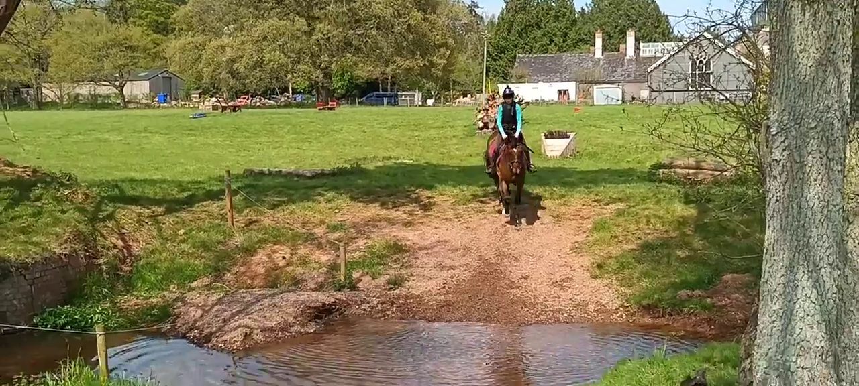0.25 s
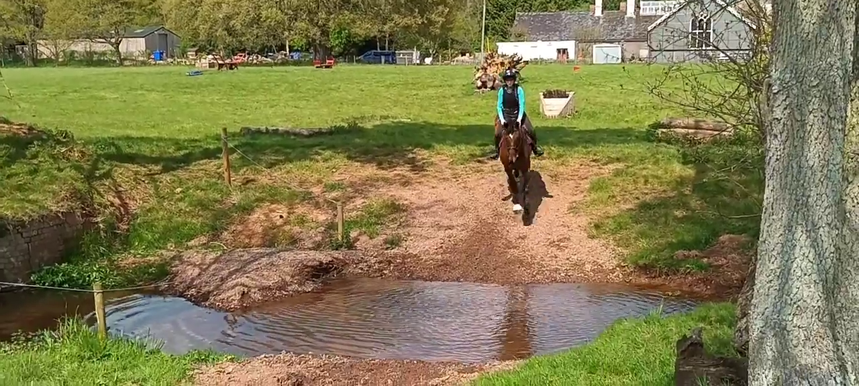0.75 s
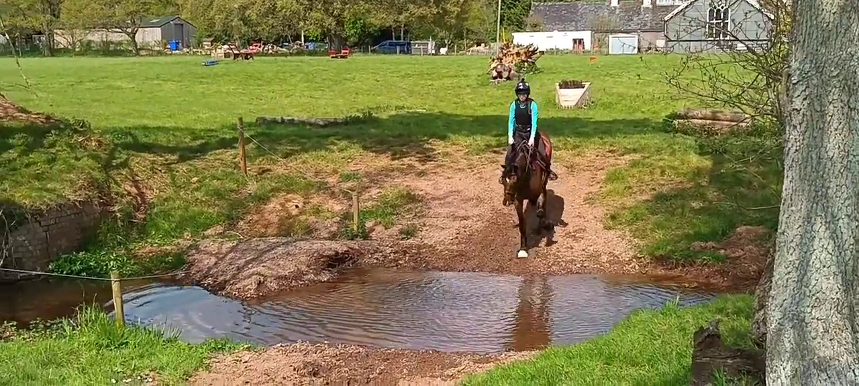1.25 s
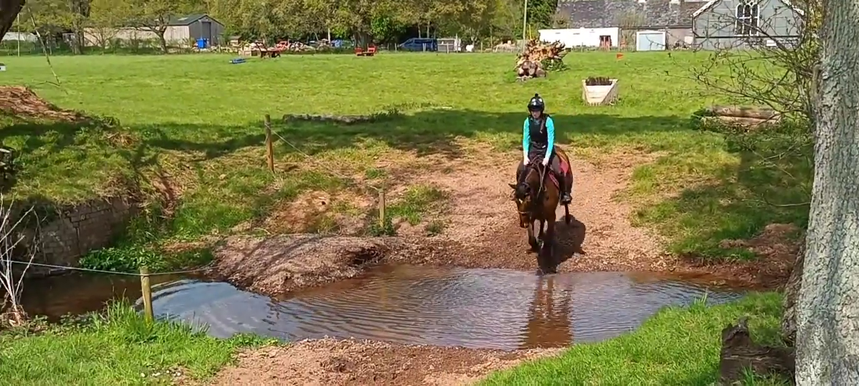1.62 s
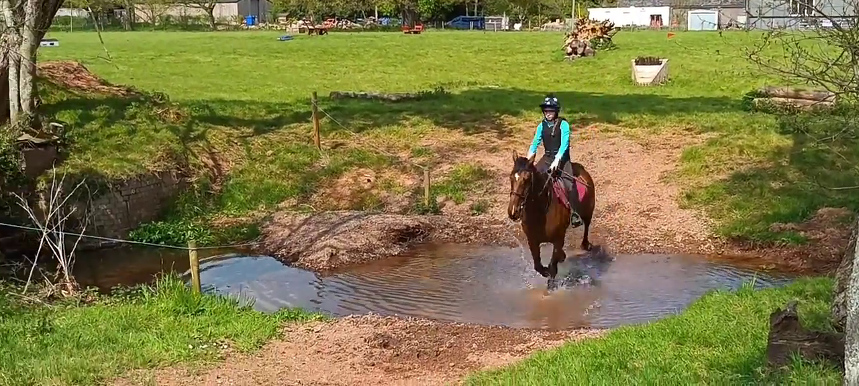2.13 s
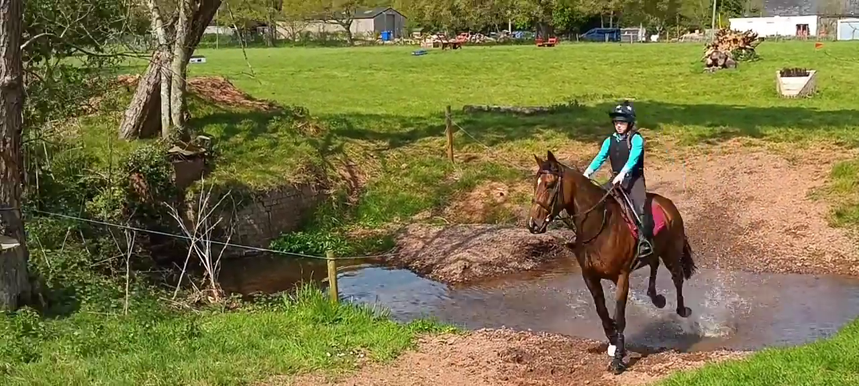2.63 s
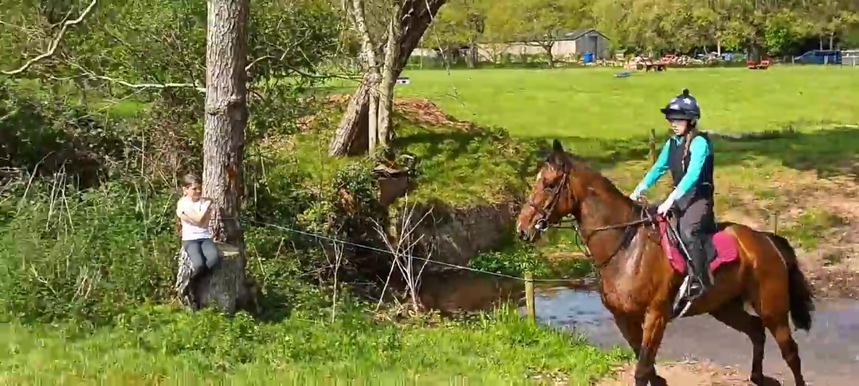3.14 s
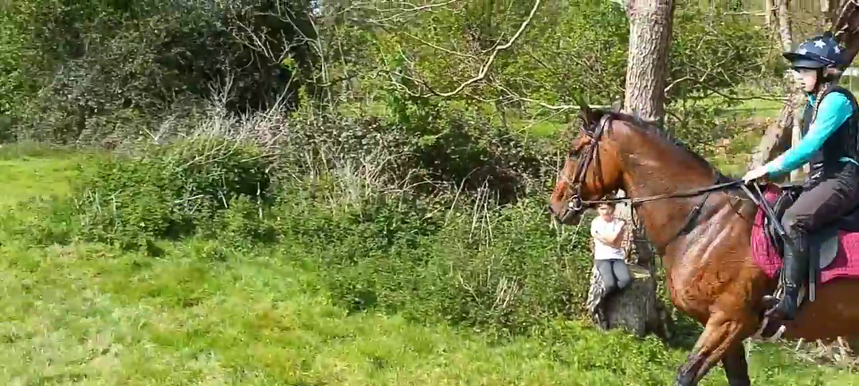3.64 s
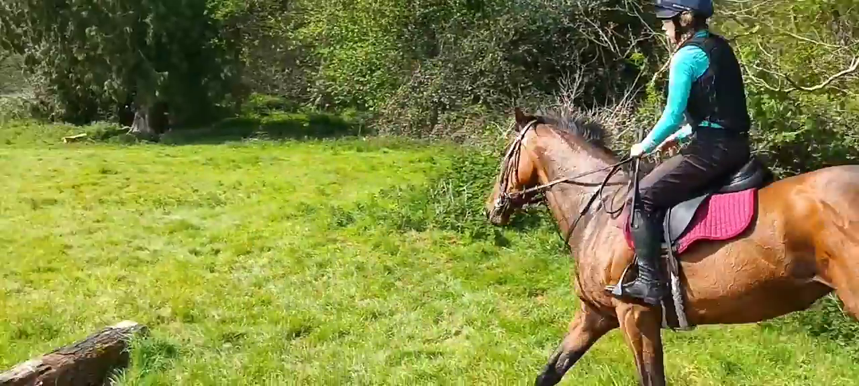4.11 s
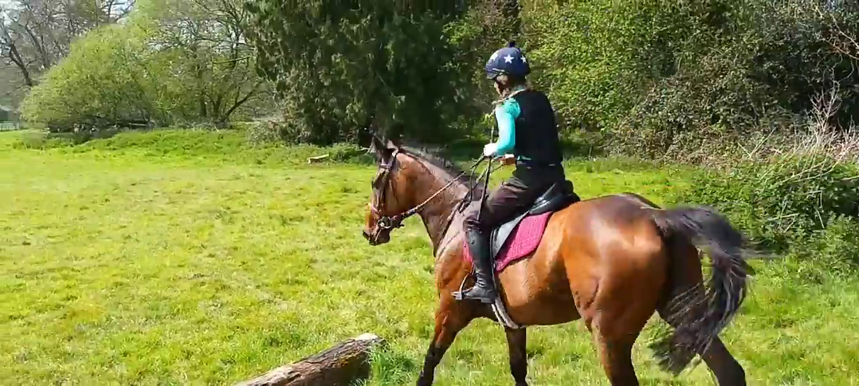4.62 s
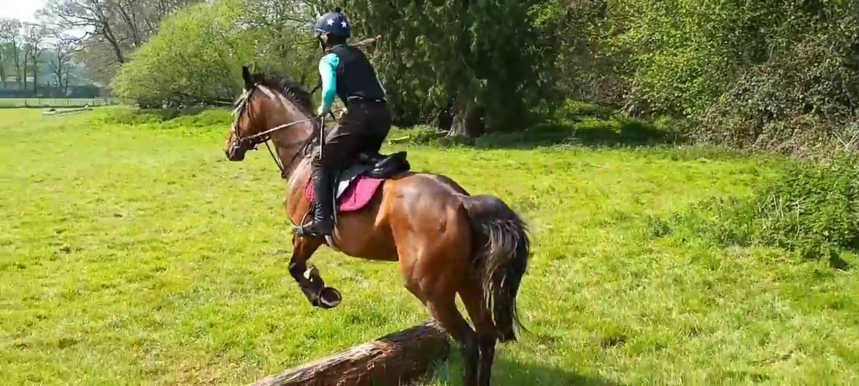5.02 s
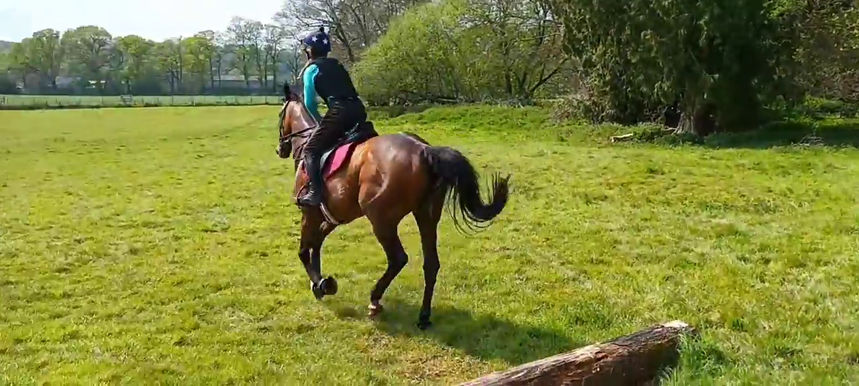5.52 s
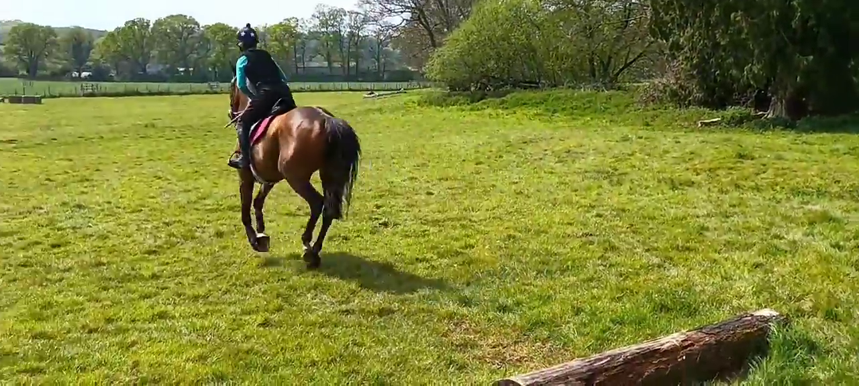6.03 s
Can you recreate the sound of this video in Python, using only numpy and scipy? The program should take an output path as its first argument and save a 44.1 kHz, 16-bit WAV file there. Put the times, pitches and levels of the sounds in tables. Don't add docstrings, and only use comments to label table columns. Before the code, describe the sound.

A horse splashes through a shallow ford in growing bursts of spray, then thuds across turf with clacking shoes, ticking tack and swishing grass.

```python
import sys
import numpy as np
from scipy import signal
from scipy.fft import rfft, irfft, next_fast_len
from scipy.io import wavfile
from scipy.ndimage import map_coordinates

SR = 44100
rng = np.random.default_rng(int(sys.argv[2]) if len(sys.argv) > 2 else 0)


def volts_from_db(level):
    exponent = np.asarray(level, float) / 20
    return 10 ** exponent


def log_audio(samples):
    frames = np.atleast_2d(samples).T
    limited = np.clip(frames, -1, 1)
    pcm = np.round(limited * 32767).astype(np.int16)
    wavfile.write(sys.argv[1], SR, pcm)


N = 276066


def rms_one(x):
    return x / np.sqrt(np.mean(x ** 2) + 1e-20)


def in_time(rows):
    s, *columns = np.transpose(rows)
    return [np.interp(np.arange(N) / SR, s, c) for c in columns]


def at_hz(points, hz):
    table_hz, table_value = np.array(points).T
    return np.interp(np.log(hz), np.log(table_hz), table_value)


def band(x, low_hz, high_hz, order=2):
    return signal.sosfilt(signal.butter(order, [low_hz, high_hz], "band", fs=SR, output="sos"), x)


def drift(rate):
    r = np.exp(-40 * np.pi * rate / SR)
    slow = signal.lfilter([1], [1, -2 * r, r * r], rng.standard_normal(N // 20 + 2002))[2000:]
    return np.interp(np.arange(N) / 20, np.arange(len(slow)), rms_one(slow))


def sides(pan_db):
    return np.array([volts_from_db(pan_db / 2), volts_from_db(-pan_db / 2)]) / np.cosh(pan_db / 17.4)


def add(out, s, sound, pan_db):
    i = round(s * SR)
    sound = sound[:N - i]
    out[:, i:i + len(sound)] += sides(pan_db)[:, None] * sound


# (frequency [Hz], gain [dB])
LEFT_PORT = [(200, -0.5), (1500, -5.5), (2300, -6), (3300, 4), (3700, -1.5), (4400, 2.5), (5200, -2.5),
             (6100, 5.5), (6900, 5), (7600, -2), (8300, -12), (10000, -11), (13700, -18), (15000, -11.5)]
RIGHT_PORT = [(200, -0.5), (1500, -1.5), (2350, 6), (3100, 6), (3800, 3.5), (4700, 7.5), (5500, 7.5),
              (6000, 0), (6500, -15), (8000, -43), (10000, -54.5), (12200, -44), (13800, -34.5),
              (15000, -15)]


def knock(hz, t60, spread, chance, echo_db):
    t = np.arange(round(0.25 * SR)) / SR
    pitches = hz * np.exp(spread * np.r_[0, chance[:3]])[:, None]
    phases = np.pi + 0.54 * chance[3:, None]
    rings = np.sin(2 * np.pi * pitches * t + phases) * volts_from_db(-60 * t / max(t60, 0.003))
    swell = (1 - np.exp(-t / (1.53 / hz + 0.00042))) ** 2
    sound = (rings * [[1], [0.7], [0.7], [0.7]]).sum(0) * swell
    sparse = rng.standard_normal(3000) * (rng.random(3000) < 0.012)
    echoes = sparse * volts_from_db(echo_db - 60 * t[:3000] / 0.19)
    sound = sound + signal.fftconvolve(sound, echoes)[:len(t)]
    port_gain = (volts_from_db(at_hz(LEFT_PORT, hz)) + volts_from_db(at_hz(RIGHT_PORT, hz))) / 2
    return sound / np.abs(sound).max() / port_gain


def thud(hz, t60, boom_db, luck):
    push = knock(hz, t60, 0.512, luck, echo_db=-23.0)
    return push + volts_from_db(boom_db) * knock(82.0, 0.085, 0.55, luck, echo_db=-20)


def clicks(rows, t60):
    out, chance = np.zeros((2, N)), rng.uniform(-0.89, 1, (len(rows), 7))
    t = np.arange(1500) / SR
    gather_and_die = (1 - np.exp(-t / 0.00097)) ** 2 * volts_from_db(-60 * t / 0.018)
    grit = rng.standard_normal((len(rows), 1500)) * gather_and_die
    grit[:, 80] += 2.5
    cracks = band(grit, 1500, 10000, order=1)
    for (s, db, hz, crack_db, pan_db), luck, crack in zip(rows, chance, cracks):
        add(out, s, volts_from_db(db) * knock(hz, t60, 0.2, luck, echo_db=-30), pan_db)
        add(out, s, volts_from_db(db + crack_db) * crack, pan_db)
    return out


# (frequency [Hz], level [dB])
FAR_HUM = [(382, -84.5), (522, -99)]


def far_hum():
    t = np.arange(N) / SR
    tones = sum(volts_from_db(db + 6 + drift(1.7)) * np.sin(2 * np.pi * hz * t) for hz, db in FAR_HUM)
    return tones * np.clip(t - 2.4, 0.3, 1)


# (time [s], level [dB], left-right [dB])
BREEZE = [(0.0, -71.5, 11), (0.15, -85, 5), (0.85, -78, -6), (1.1, -61.5, 11.5), (1.24, -59, -10.5),
          (1.39, -62.5, 22), (1.6, -58, -21), (1.71, -71, -15), (2.39, -80.5, 6.5), (3.24, -65, -3),
          (3.49, -78, 5), (3.63, -75, 15), (3.9, -80, -4.5), (4.43, -76.5, -2), (4.92, -72.5, -7),
          (5.13, -83.5, -3), (5.63, -72.5, -3.5), (6.26, -76.5, 0)]


def breeze():
    db, pan_db = in_time(BREEZE)
    rumble = rms_one(band(rng.standard_normal((2, N + SR)), 32, 141.3))[:, SR:]
    lumps = volts_from_db(4.5 * np.array([drift(8.4), drift(6.4)]))
    return volts_from_db(db + 15) * sides(pan_db) * rumble * lumps


# (time [s], peak level [dB], frequency [Hz], left-right [dB])
GUSTS = [
    (0.066, -39, 88.5, 32),
    (0.521, -35, 71.5, 15),
    (0.545, -29.5, 143.6, 14),
    (0.8, -42.5, 115, 30),
    (3.486, -48, 90, 25.5),
    (6.173, -44.5, 94.7, -20),
]


def gusts():
    out, chance = np.zeros((2, N)), rng.uniform(-1.014, 1, (len(GUSTS), 7))
    for (s, db, hz, pan_db), luck in zip(GUSTS, chance):
        add(out, s, volts_from_db(db) * thud(hz, 0.078, -5, luck), pan_db)
    return out


# (time [s], peak level [dB], frequency [Hz], left-right [dB])
FOOTFALLS = [
    (1.198, -59.5, 88.8, -26),
    (1.219, -39, 84.6, -25),
    (1.37, -40, 82, 18),
    (2.1, -49, 88.8, 6),
    (2.471, -46, 116, -15),
    (4.884, -49.5, 65.6, -21),
    (4.957, -54.5, 105, -17),
    (5.27, -53, 231, -1),
    (5.502, -52, 129, -30),
    (5.658, -58, 217, -13),
]


def footfalls():
    out, chance = np.zeros((2, N)), rng.uniform(-1.22, 1, (len(FOOTFALLS), 7))
    for (s, db, hz, pan_db), luck in zip(FOOTFALLS, chance):
        add(out, s, volts_from_db(db + 3.0) * knock(hz, 0.073, 0.33, luck, echo_db=-23.5), pan_db)
    return out


# (time [s], peak level [dB], frequency [Hz])
TICKS = [(0.2728, -42, 6600), (0.4199, -38, 6660), (0.5072, -38, 2420), (0.6709, -48, 5510),
         (0.9494, -40, 2240), (1.6222, -26.5, 2300), (3.7903, -35, 5650), (4.2378, -27, 4400),
         (4.4044, -29, 2350), (4.5027, -34.5, 2310), (4.8713, -45, 2250), (5.1093, -41, 2160),
         (5.4575, -48, 7360)]


def ticks():
    out, chance = np.zeros((2, N)), rng.uniform(-1.22, 1, (len(TICKS), 7))
    for (s, db, hz), luck in zip(TICKS, chance):
        add(out, s, volts_from_db(db - 5.5) * knock(hz, 0.0087, 0.2, luck, echo_db=-28), 4)
    return out


# (time [s], length [s], level [dB], frequency [Hz])
BLOWS = [
    (2.779, 0.059, -72, 640),
    (4.327, 0.037, -78.5, 730),
    (4.331, 0.087, -78.5, 1150),
]


def nostrils():
    out = np.zeros((2, N))
    for s, length, db, hz in BLOWS:
        air = rms_one(band(rng.standard_normal(8000), hz, hz * 1.195))[2000:]
        t = np.arange(len(air)) / SR
        puff = np.sqrt(np.sin(np.pi * np.minimum(t / length, 1)) + 1e-9)
        add(out, s, volts_from_db(db + 27) * air * puff, 0)
    return out


# (time [s], peak level [dB])
CHINKS = [
    (0.725, -46),
    (.744, -23.5),
    (0.757, -36),
    (.769, -41),
    (0.777, -39),
    (0.789, -45),
    (0.803, -45),
]
# (frequency [Hz], level [dB], t60 [s])
BIT_RING = [(5340, 0, 0.025), (5950, 4.5, 0.0077), (8860, -11, 0.034)]


def bit_ring():
    out, t = np.zeros((2, N)), np.arange(SR // 10) / SR
    ring = sum(volts_from_db(db - 60 * t / t60) * np.sin(2 * np.pi * hz * t) for hz, db, t60 in BIT_RING)
    onset = 1 - np.exp(-t / 0.00072)
    for s, db in CHINKS:
        add(out, s, volts_from_db(db) * ring * onset, 1.5)
    return out


# (time [s], peak level [dB], frequency [Hz], crack share [dB],
# left-right [dB])
BUCKLES = [(3.321, -36, 5170, -13, 2), (3.5, -36, 5200, -7, 1), (3.545, -31.5, 5330, -18, -2),
           (3.671, -32, 4960, 1, 18), (3.722, -57, 4500, -8, -12), (3.921, -37.5, 5300, -17, 8),
           (4.005, -41, 6200, 5.5, -17), (4.44, -33.5, 3230, 0.5, 18), (4.457, -34, 4050, -21, 19),
           (4.66, -43.5, 6840, -13, 13), (4.785, -23.5, 5680, -3.5, 13), (4.964, -44.5, 5600, 9.5, 17),
           (5.254, -34.5, 5130, 0, 27), (5.269, -13, 5060, -6, 5.5), (5.42, -40.5, 5260, 0.5, 4),
           (5.493, -39.5, 5540, -12, 12)]


def buckles():
    return clicks(BUCKLES, t60=0.0051)


# (time [s], peak level [dB], frequency [Hz], crack share [dB], left-right [dB])
STONES = [(2.618, -17.5, 1077, 0, 1), (2.711, -23, 1020, -1, -1.5), (3.124, -15.5, 714, -9, 3.5),
          (3.237, -19, 1287, -5, 0), (3.351, -21.5, 2410, 0.5, -3), (4.025, -16, 2286, -4.5, 13),
          (4.151, -38, 2810, -18, -17), (4.226, -24.5, 620, -26, 4), (4.892, -38, 2230, 2, 9),
          (5.136, -35.5, 2290, 5, 8), (5.671, -39.5, 1316, -0.5, 13), (5.843, -35, 2700, 10.5, 8),
          (6.051, -27.5, 1435, -33, 25)]


def stones():
    return clicks(STONES, t60=0.014)


# (time [s], peak level [dB], frequency [Hz], t60 [s], left-right [dB])
HOLLOWS = [(1.078, -36, 706, 0.11, 5), (1.087, -27.5, 1440, 0.056, 6), (2.712, -29, 1390, 0.021, 6),
           (3.237, -21.5, 2280, 0.012, 3.5), (3.234, -29, 515, 0.023, 8), (3.353, -38.5, 903, 0.065, 11),
           (3.6, -37, 1810, 0.069, -11), (3.644, -35, 950, 0.073, 3), (4.021, -31, 1550, 0.034, -5),
           (5.135, -37.5, 1330, 0.026, 9), (5.269, -34, 1094, 0.013, 11), (5.67, -40.5, 2500, 0.031, 0),
           (6.049, -42.5, 4270, 0.011, 25.5), (1.954, -30.5, 596, 0.057, 6)]


def hollows():
    out, chance = np.zeros((2, N)), rng.uniform(-1.027, 1, (len(HOLLOWS), 7))
    for (s, db, hz, t60, pan_db), luck in zip(HOLLOWS, chance):
        add(out, s, volts_from_db(db) * knock(hz, t60, 0.2, luck, echo_db=-30), pan_db)
    return out


# (time [s], peak level [dB], frequency [Hz], crack share [dB], left-right [dB])
SMACKS = [(0.543, -33, 6720, -14, 30), (1.037, -38, 4380, 5, 5), (1.077, -23, 6700, -12.5, 13),
          (1.171, -26.5, 6040, 4.5, 7.5), (1.304, -23, 6430, -6.5, 5), (1.382, -24.5, 1960, -18.5, 7.5),
          (1.43, -17, 6130, -14, 3.5), (1.552, -9, 5880, -10.5, -4), (1.639, -13, 2250, 0, 4),
          (1.664, -27, 706, -11, -10), (1.86, -14.5, 5740, 2, -4), (2.095, -27, 6370, 3.5, 30),
          (2.196, -16, 6100, -12, -6)]


def smacks():
    return clicks(SMACKS, t60=0.013)


# (time [s], peak level [dB], frequency [Hz], boom share [dB])
HOOFBEATS = [(1.46, -30.5, 253, -7), (1.656, -23.5, 358, -40), (1.884, -35, 317, -31),
             (1.989, -33.5, 328, -17.5), (2.121, -37.5, 250, -11), (2.228, -43.5, 211, -25),
             (2.551, -31, 264, -10.5), (2.604, -33.5, 260, -14), (2.707, -39, 240, -5.5),
             (2.985, -41.5, 161, -21), (3.113, -26, 283.6, -6), (3.225, -24.5, 350, -17),
             (3.582, -32.5, 224, -25), (3.63, -26.5, 222, -22), (4.176, -29, 228, -10.5),
             (4.219, -25.5, 347, -8.5), (4.546, -24.5, 213, -10.5)]


def hoofbeats():
    t60, pan_db, delay_s = 0.058, -1.5, 0.00298
    out, chance = np.zeros((2, N)), rng.uniform(-1.014, 1, (len(HOOFBEATS), 7))
    puff = rms_one(band(rng.standard_normal(N), 153.4, 1380))
    for (s, db, hz, boom_db), luck in zip(HOOFBEATS, chance):
        s = s + delay_s
        push = thud(hz, t60, boom_db, luck)
        turf = puff[round(s * SR):][:len(push)]
        push[:len(turf)] += volts_from_db(-24.0) * turf * volts_from_db(-60 * np.arange(len(turf)) / SR / 0.058)
        add(out, s, volts_from_db(db) * push, pan_db)
    return out


def droplets(per_s, spread_db, cycles):
    landed = rng.random(N) < per_s * volts_from_db(5.0 * drift(30.0)) / SR
    sizes = landed * volts_from_db(spread_db * np.minimum(rng.exponential(1, N), 4)) * rng.choice([-1, 1], N)
    dealt, out = rng.integers(0, 30, N), 0
    for k, hz in enumerate(np.geomspace(300, 14000, 30)):
        r = volts_from_db(-60 * hz / (cycles * SR))
        turn = 2 * np.pi * hz / SR
        rings = signal.lfilter([1], [1, -2 * r * np.cos(turn), r * r], sizes * (dealt == k) + 1e-18)
        out = out + hz * rings * np.sin(turn)
    return rms_one(out)


def leg_bursts(legs, rise_s, air_db):
    power = np.zeros((4, N))
    for s, peak_db, mid_share_db, low_share_db, t60 in legs:
        i = round(s * SR)
        t = np.arange(min(SR, N - i)) / SR
        shape = (1 - np.exp(-t / rise_s)) ** 0.86 * volts_from_db(-60 * t / max(t60, 0.02))
        thin_air_db = air_db - 0.23 * mid_share_db
        shares_db = np.c_[[low_share_db + 11, mid_share_db + 6.5, 0, thin_air_db]]
        power[:, i:i + len(t)] += (volts_from_db(peak_db - 10.0 + shares_db) * shape) ** 2
    return power


# (time [s], peak level [dB], stalk share [dB], soil share [dB], t60 [s])
SWISHES = [(3.0675, -43, -0.5, -1.5, 0.13), (3.1237, -34.5, 5.5, 15, 0.095), (3.234, -56, 14.5, 16, 0.44),
           (3.3493, -42, 13, 13, 0.09), (3.503, -41, -12, -20, 0.77), (3.5822, -33, 3, -10.5, 0.3),
           (3.6442, -22, 4.5, -10.5, 0.059), (4.1335, -32.5, 0, -36, 0.15), (4.181, -30.5, 9, -6, 0.053),
           (4.2216, -37, 5, 1, 0.12), (4.5511, -33.5, -16, 7.5, 0.1), (4.7845, -41.5, -14, -8.5, 0.28)]


def swishes():
    return leg_bursts(SWISHES, rise_s=0.0076, air_db=9.5)


# (time [s], peak level [dB], slap share [dB], gurgle share [dB], t60 [s])
SPLASHES = [(0.1775, -29.5, -11, -23, 0.19), (0.3735, -37.5, -42, -14, 0.15),
            (0.5417, -28.5, -8.5, -17, 0.22), (0.854, -24, -0.5, -27.5, 0.25),
            (1.0745, -19, -3, -24.5, 0.18), (1.3024, -20, -1, -50, 0.22), (1.432, -15.5, -0.5, -31, 0.24),
            (1.4714, -22.5, -20.5, -27, 0.57), (1.6377, -23.5, 1, 1, 0.33),
            (1.8577, -22.5, -4.5, -13.5, 0.6), (1.9465, -10.5, -3.5, -9.5, 0.094),
            (2.0916, -5, -14.5, -31, 0.04), (2.195, -27.5, -7, -39, 0.42),
            (2.4668, -19.5, -10, -15.5, 0.13)]


def splashes():
    return leg_bursts(SPLASHES, rise_s=0.014, air_db=1.66)


DULL_FROM_S = 5.903
# (time [s], level [dB])
SPRAY = [(0.0, -71.5), (0.49, -72), (0.84, -54), (1.0, -64.5), (1.14, -53.5), (1.41, -52), (1.5, -44),
         (1.85, -41.5), (2.31, -39), (2.64, -46.5), (3.06, -57.5), (3.6, -62), (3.75, -54.5), (4.15, -58),
         (4.36, -52.5), (4.6, -61.5), (5.2, -62), (5.9, -72.5)]
LEAVES_DB = [-60.5, -67.5, -86.5, -67.5]
SPRAY_SHARE_DB = [-41, -5.5, -3.5, -6.5]
DAMPING_DB = [-12.5, -5.5, -22, -22]
# (frequency [Hz], share [0-1])
ALIKE = [(250, .9), (1500, .84), (2800, .84), (3500, .5), (5000, .7), (9000, .4), (15000, .4)]


def water_and_grass(patchy_db=2.0, gap_share=0.44):
    spray_db, = in_time(SPRAY)
    centres = np.log([600, 1700, 5500, 10000])
    wet = np.clip((spray_db + 70) / 14, 0.5, 2)
    near = rng.standard_normal((2, N)) + wet * droplets(per_s=2200.0, spread_db=3.0, cycles=39.0)
    scattered = rng.standard_normal((2, 2, N))
    power = volts_from_db(np.c_[LEAVES_DB]) ** 2 + volts_from_db(spray_db + np.c_[SPRAY_SHARE_DB]) ** 2
    power[:, round(DULL_FROM_S * SR):] *= volts_from_db(np.c_[DAMPING_DB]) ** 2
    level = 10 * np.log10(power + splashes() + swishes())
    out, surge = 0, drift(33.5)
    edges = 220 * 2 ** np.arange(0, 6.6, 1 / 2)
    for k, (low, high) in enumerate(zip(edges, np.minimum(edges[1:], 0.45 * SR))):
        hz = np.sqrt(low * high)
        weights = [np.interp(np.log(hz), centres, row) for row in np.eye(4)]
        alike = np.clip(at_hz(ALIKE, hz), 0, 1)
        mix = np.sqrt(alike) * near[k % 2] + np.sqrt(1 - alike) * scattered[k % 2]
        gain_db = weights @ level + patchy_db * (surge + drift(22.4))
        out = out + volts_from_db(gain_db) * band(mix, low, high)
    out = out - gap_share * band(out, 890, 1204, order=1)
    out = out - 0.46 * band(out, 3260, 3790, order=1)
    out = out - 0.49 * band(out, 2690, 2964, order=1)
    return volts_from_db(7.5) * out * sides(1.01)[:, None]


def scene():
    surroundings = far_hum() + breeze() + gusts() + footfalls() + ticks()
    tack = nostrils() + bit_ring() + buckles()
    shoes = stones() + hollows() + smacks() + hoofbeats()
    return surroundings + tack + shoes + water_and_grass()


def port(x, response):
    size = 2 * next_fast_len(N // 2 + SR // 20)
    hz = np.fft.rfftfreq(size, 1 / SR)
    cepstrum = irfft(np.log(volts_from_db(at_hz(response, np.maximum(hz, 1)))), size)
    cepstrum[1:size // 2] *= 2
    cepstrum[size // 2 + 1:] = 0
    return irfft(rfft(x, size) * np.exp(rfft(cepstrum)), size)[:N]


def low_pass(x):
    return signal.sosfilt(signal.butter(12, 16850, fs=SR, output="sos"), x)


# (time [s], lag [s])
RIGHT_LAG = [(0, .00008), (1.2, .00009), (4.3, .00009), (4.6, .0), (6.26, .0)]
# (frequency [Hz], level [dB])
LEFTOVER = [(760, -68.5), (3050, -71.5)]


def record(dry):
    self_noise_db, dull_hz, dull_db = -76.5, 6400, -1.5
    dry = dry + volts_from_db(self_noise_db) * rng.standard_normal(dry.shape)
    lows = signal.sosfilt(signal.butter(4, dull_hz, fs=SR, output="sos"), dry)
    late = np.arange(N) > DULL_FROM_S * SR
    x = np.where(late, lows + volts_from_db(dull_db) * (dry - lows), dry)
    behind = map_coordinates(x[1], [np.arange(N) - SR * in_time(RIGHT_LAG)[0]], order=5)
    x = np.array([port(x[0], LEFT_PORT), port(behind, RIGHT_PORT)])
    for hz, db in LEFTOVER:
        x = x + late * volts_from_db(db) * rms_one(band(rng.standard_normal((2, N)), hz * 0.82, hz * 1.18))
    x = signal.sosfilt(signal.butter(2, 55, "high", fs=SR, output="sos"), x)
    x = signal.sosfilt(signal.cheby2(14, 60, 16350, fs=SR, output="sos"), x)
    return low_pass(x)


dry = scene()
out = record(dry)
log_audio(out)
```